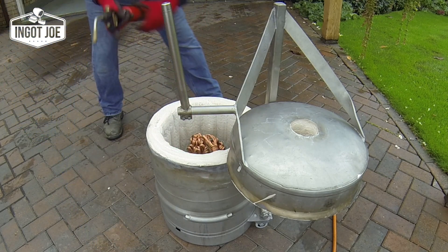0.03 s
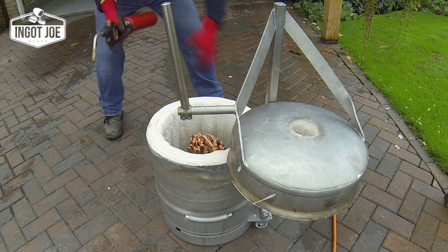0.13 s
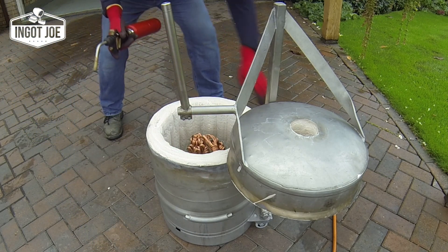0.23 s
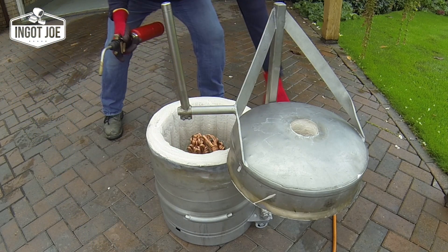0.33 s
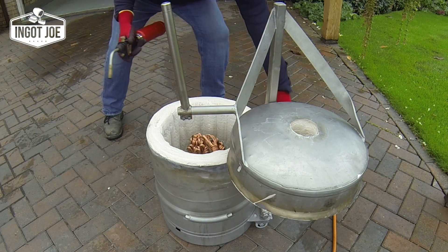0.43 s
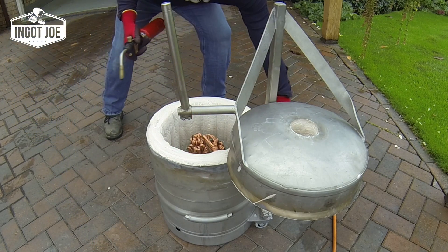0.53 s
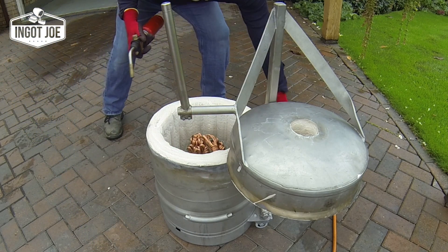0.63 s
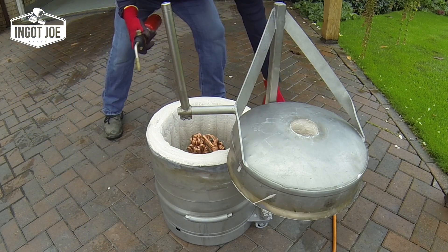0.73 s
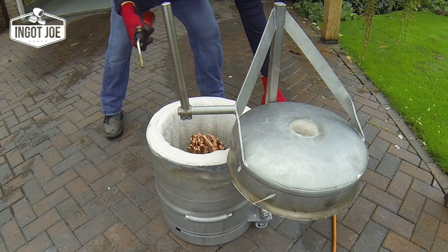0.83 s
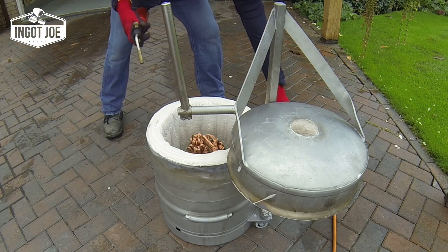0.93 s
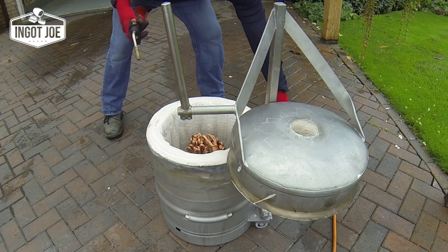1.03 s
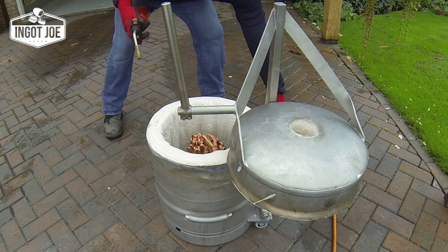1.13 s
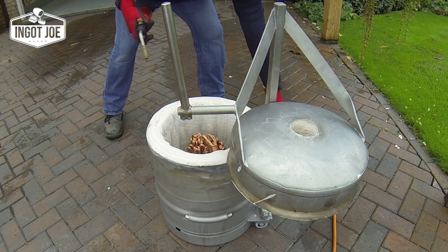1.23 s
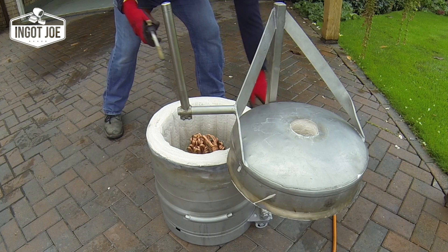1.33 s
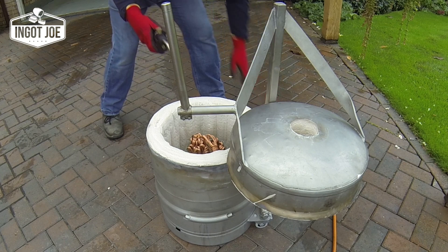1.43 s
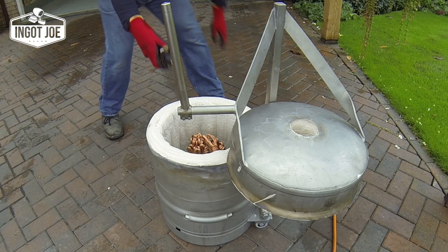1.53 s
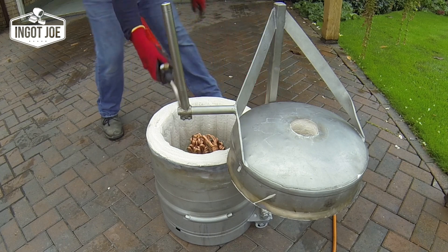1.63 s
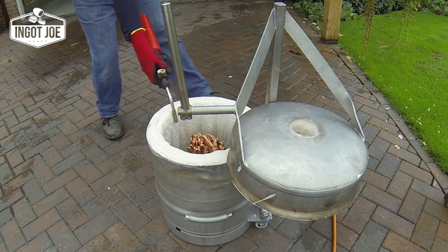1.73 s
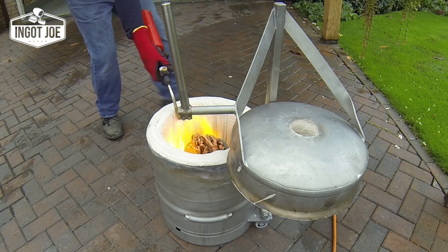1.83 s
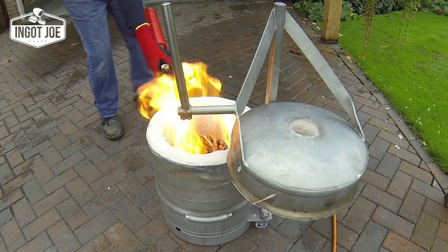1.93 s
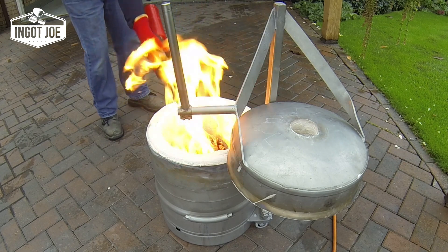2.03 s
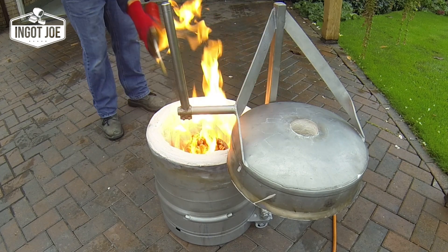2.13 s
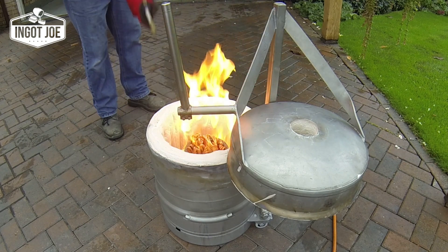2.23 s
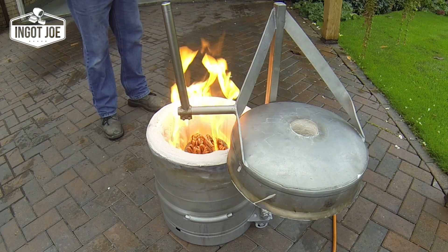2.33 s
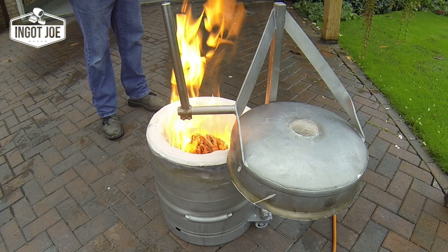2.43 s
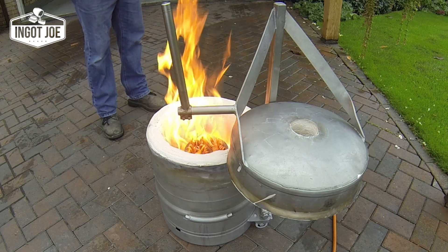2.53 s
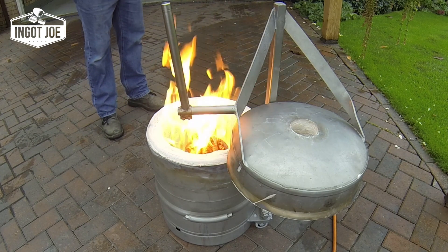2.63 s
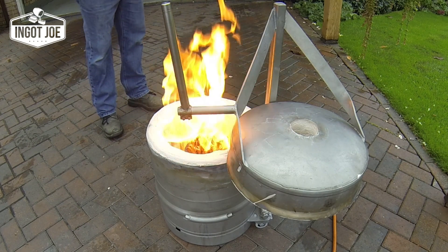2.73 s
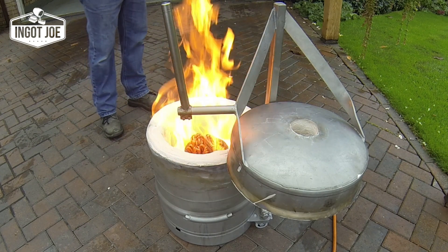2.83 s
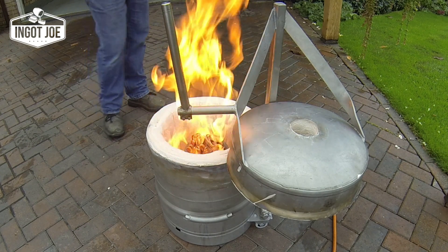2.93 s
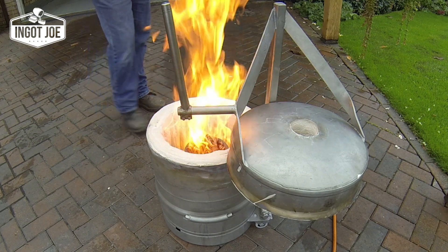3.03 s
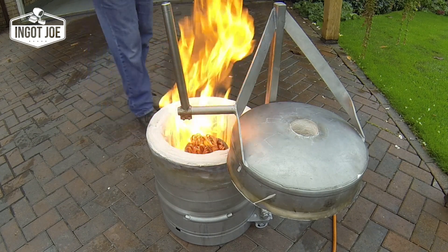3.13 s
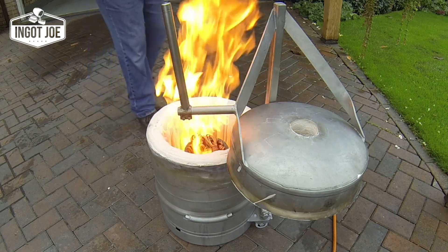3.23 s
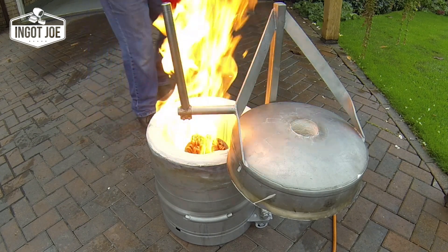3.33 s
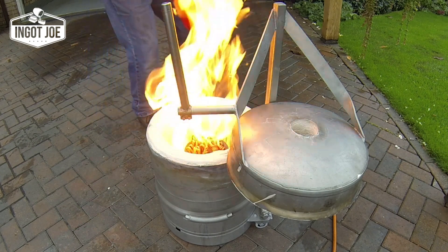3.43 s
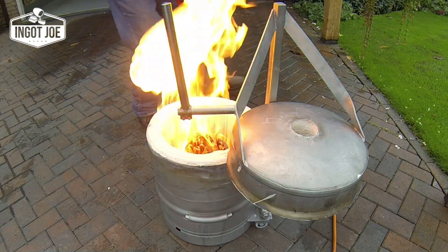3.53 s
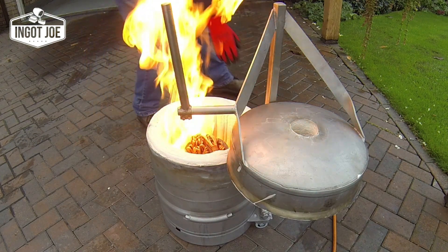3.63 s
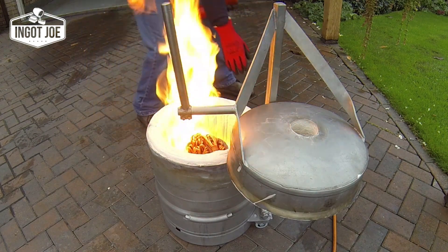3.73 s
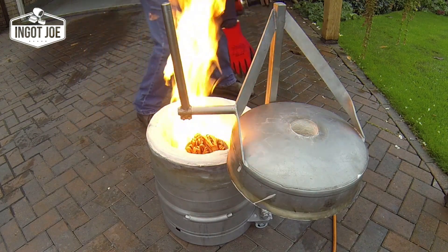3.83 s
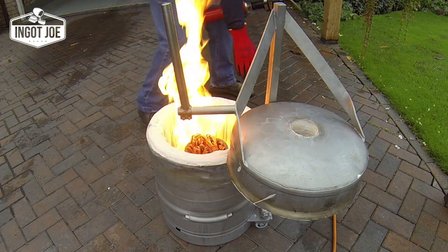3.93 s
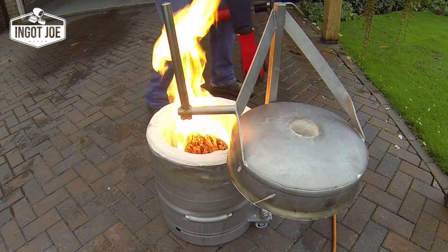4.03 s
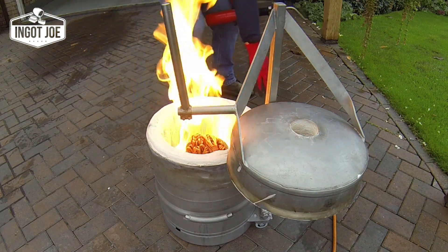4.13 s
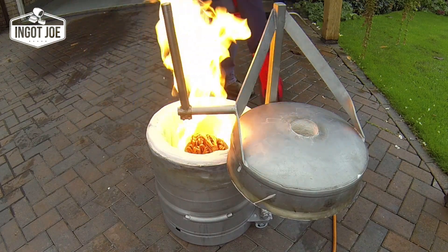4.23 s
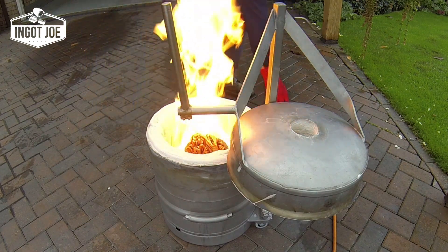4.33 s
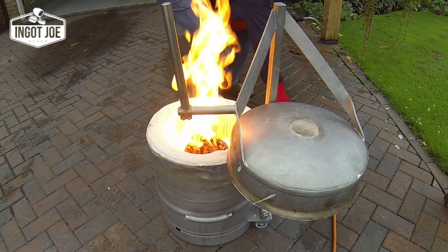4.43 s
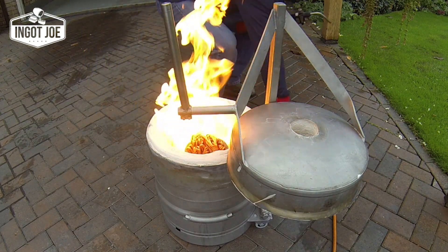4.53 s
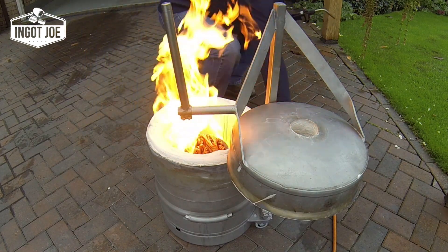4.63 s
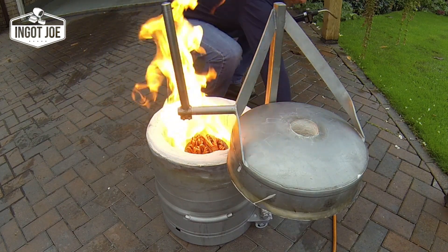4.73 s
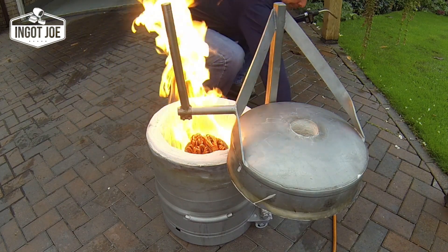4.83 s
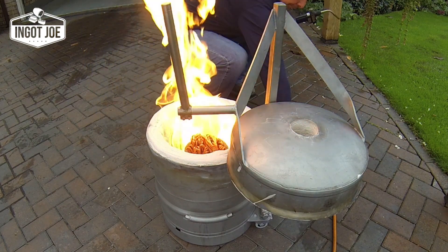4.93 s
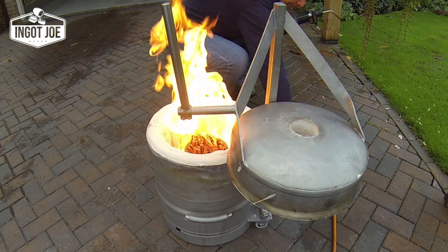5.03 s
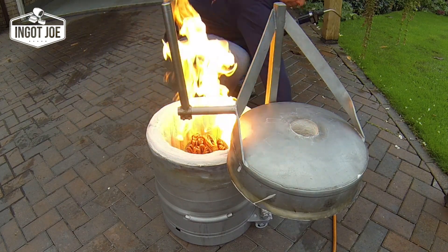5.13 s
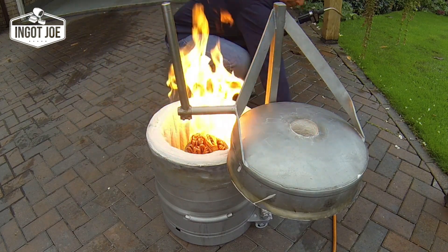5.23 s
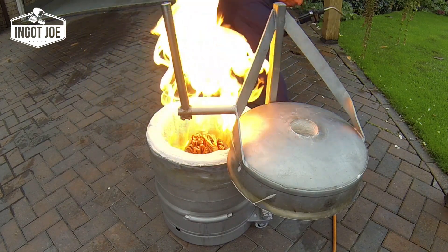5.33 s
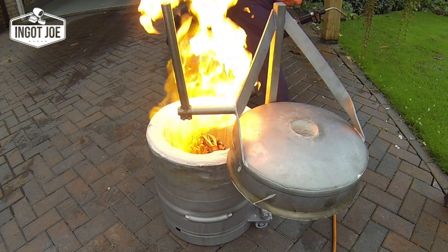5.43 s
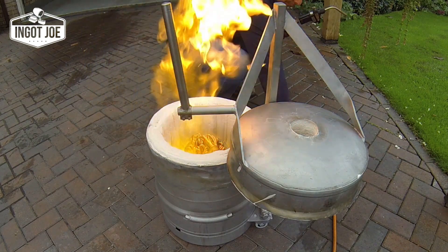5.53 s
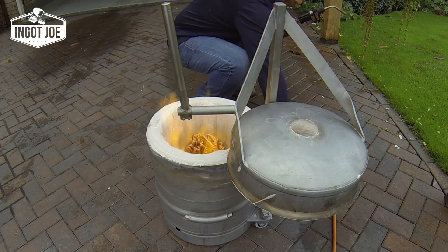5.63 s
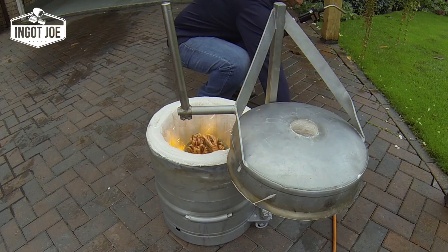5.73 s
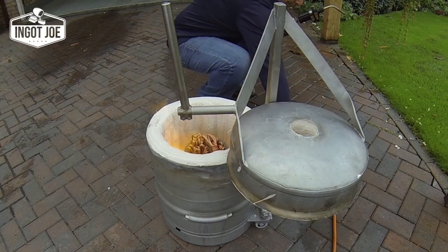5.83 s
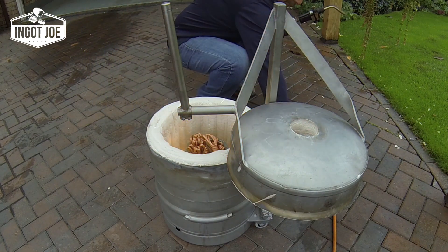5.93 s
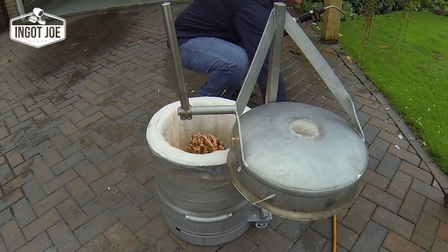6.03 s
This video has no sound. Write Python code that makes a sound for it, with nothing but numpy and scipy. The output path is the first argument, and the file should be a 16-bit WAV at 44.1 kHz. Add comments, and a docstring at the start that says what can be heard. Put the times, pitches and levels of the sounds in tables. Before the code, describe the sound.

A quiet paved yard with faint airy background, heard close in wavering stereo. A dull boot thud opens, then a tiny faint squeak at 0.2 seconds and soft metal clicks until 0.7. At about 1.05 a gas valve opens: a sharp, bright hiss starts abruptly and rings thinly in the burner tube. At 1.72 a torch clicks sharply and the gas catches in a low whoump and rushing surge, fading by about 2.1 with another click near 1.96. From 2.2 to 5.1 a weak, lazy flame flutters under the steady hiss, with wavering, faint hollow tube notes and scattered muffled thuds, strongest around 3.1 to 3.7 and 4.2. At 5.17 the valve clicks and a spurt of flame rushes up; hollow roaring and booms build from 5.3. Ringing metal clicks and further spurts follow at 5.45 and 5.75, then heavy deep booms and a throbbing roar dominate until the cut-off near 6.1.

```python
"""Dull thuds of boots, a faint squeak and metal clicks sound over a paved yard with a lined steel drum burner.
The valve opens: jet noise hisses and excites the burner tube. A torch clicks and the cloud flashes as a low surge.
A lazy flame flutters, made of random puffs exciting resonances; spurts of gas, more air and big booms of burning
pockets then turn it into a throbbing roar.
One microphone feeds two outputs, whose phase and level differences vary over frequency; the phase wavers."""
import sys
import numpy as np
from scipy import signal
from scipy.io import wavfile
from scipy.ndimage import uniform_filter1d

SR = 44100
rng = np.random.default_rng(int(sys.argv[2]) if len(sys.argv) > 2 else 0)


def transcribe(u):
    """Save the signal u as a 16-bit wav file named by the first command-line argument.

    u: samples, shape (n,) or (channels, n), limited to [-1, 1]; the rate is SR.
    q: integer samples, one column per channel.
    """
    v = np.clip(np.atleast_2d(u).T, -1, 1)
    q = np.round(v * 32767).astype(np.int16)
    wavfile.write(sys.argv[1], SR, q)


N = 268833
IGNITION_S = 1.72  # the gas catches


def from_db(db):
    """Amplitude ratio: 20 dB for each factor of ten."""
    return 10 ** (np.asarray(db) / 20)


def rms_one(x):
    """Normalisation of the signal to unit root-mean-square amplitude."""
    return x / np.sqrt(np.mean(x ** 2) + 1e-20)


def in_time(rows):
    """Linear interpolation of each column against time, one value a sample."""
    s, *columns = np.transpose(rows)
    return [np.interp(np.arange(N) / SR, s, column) for column in columns]


def at_hz(table, hz, axis=1):
    """Interpolation of one column over the logarithm of frequency."""
    table = np.array(table)
    return np.interp(np.log(hz + 1), np.log(table[:, 0]), table[:, axis])


def drift(corner_hz):
    """Low-pass noise: two equal poles leave a slow random fluctuation of unit rms."""
    step = 40  # samples between computed points
    pole = np.exp(-2 * np.pi * corner_hz * step / SR)
    white = rng.standard_normal(N // step + 2002)
    slow = signal.lfilter([1], [1, -2 * pole, pole * pole], white)[2000:]  # past the onset of the filter
    return np.interp(np.arange(N) / step, np.arange(len(slow)), rms_one(slow))


def resonances(x, modes):
    """Modal superposition: parallel damped resonators (Hz, width Hz, dB) of alternating sign."""
    out = 0
    for k, (hz, width, db) in enumerate(modes):
        radius = np.exp(-np.pi * abs(width) / SR)
        gain = from_db(db) * (-1) ** k * (1 - radius * radius) / 2
        poles = [1, -2 * radius * np.cos(2 * np.pi * hz / SR), radius * radius]
        out = out + signal.lfilter(gain * np.array([1, 0, -1]), poles, x + 1e-18)
    return out


def steadied(x, over_s, share):
    """Envelope compression: a share of the sound's own short-term swell is divided out."""
    swell = uniform_filter1d(rms_one(x) ** 2, round(over_s * SR)) + .02
    return rms_one(x / swell ** (share / 2))


def hiss(spectrum, patchy_db, shared_db):
    """Turbulence noise: half-octave bands flicker partly alone and partly together."""
    out, together = 0, drift(4.2)
    edges = 200 * 2 ** np.arange(0, 6.6, .5)  # Hz
    white = rng.standard_normal((2, N))
    for k, (low, high) in enumerate(zip(edges, edges[1:])):
        level_db = at_hz(spectrum, np.sqrt(low * high))
        level_db = level_db + patchy_db * drift(10) + shared_db * together
        bandpass = signal.butter(2, [low, high], "band", fs=SR, output="sos")
        out = out + from_db(level_db) * signal.sosfilt(bandpass, white[k % 2])
    return rms_one(out)


def puffs(per_s, uneven_db):
    """Random impulse train: independent clicks of very uneven size and random sign."""
    sizes = from_db(uneven_db * np.minimum(rng.exponential(1, N), 4))
    signs = rng.choice([-1, 1], N)
    return sizes * signs * (rng.random(N) < per_s / SR)


def yard_air():
    """Background noise: a steady-level spectrum whose bands flicker."""
    # sound of the yard: (frequency [Hz], relative density [dB per Hz])
    spectrum = [(300, -20), (700, 3), (1500, -15), (2500, -19), (5000, -15.5), (10000, -11.5), (13000, -24),
                (16000, -38)]
    return from_db(-60.5) * hiss(spectrum, patchy_db=-2.0, shared_db=-2.0)


def flame():
    """Combustion noise: pockets burning one by one excite deep and drum modes, under a rush of noise."""
    # low sound of yard, flash, lazy flame and blast, before flutter and spurts:
    # (time [s], rumble level [dB], drum roar level [dB], flame rush level [dB])
    burn = [(0, -52, -49, -58), (.3, -53.5, -59.5, -63.5), (1.03, -50.5, -62, -63.5),
            (1.06, -47, -50.5, -53.5), (1.55, -54.5, -55.5, -54), (1.722, -54, -50.5, -50),
            (1.735, -21, -40, -28), (1.8, -43, -30.5, -30.5), (1.9, -43, -31.5, -36),
            (2.0, -48, -36, -39.5), (2.15, -51.5, -53, -52.5), (2.8, -51, -46.5, -57),
            (3.2, -47, -46.5, -53.5), (4.0, -49, -51.5, -56.5), (4.35, -48.5, -47.5, -54),
            (5.165, -49.5, -54, -56.5), (5.2, -46, -37.5, -41), (5.31, -31.5, -24, -44.5),
            (5.55, -30, -23.5, -36), (5.71, -18, -18.5, -35.5), (5.765, -29, -22, -34.5),
            (5.81, -24, -16, -36.5), (5.9, -16.5, -17.5, -40), (6.09, -28.5, -15, -37.5)]
    # deep modes: (frequency [Hz], width [Hz], gain [dB])
    rumble_modes = [(59.3, 54, -2.5), (90, 45.4, -5)]
    # modes of the hollow drum: (frequency [Hz], width [Hz], gain [dB])
    drum_modes = [(117, 21.5, 1), (157.2, 30.6, 1.5), (239.2, 19.2, -3), (301.3, 15.8, -3),
                  (357.2, 29.6, -3.5), (473.3, 9.6, -7.5), (542.4, 32, -11), (745, 720, -30.5)]
    # flame rush: (frequency [Hz], relative density [dB per Hz])
    rush_spectrum = [(300, -10), (600, 0), (1000, -3.5), (1400, -3.5), (2200, -7.5), (3500, -18.5),
                     (7000, -15), (15000, -16.5)]
    rumble_db, roar_db, rush_db = in_time(burn)

    burning = puffs(per_s=1100, uneven_db=3.5)
    deep = resonances(burning + 1.5 * rms_one(rng.standard_normal(N)), rumble_modes)
    rumble = steadied(resonances(deep, [(76.6, 103, 0)]), over_s=0.14, share=1.0)
    hollow = resonances(burning, drum_modes)
    roar = steadied(resonances(hollow, [(246, 344, 0)]), over_s=0.0048, share=0.32)
    rush = hiss(rush_spectrum, patchy_db=-0.5, shared_db=0.74)

    lit = np.arange(N) / SR > IGNITION_S
    flutter_hz = 9.0
    # flutter of the burning flame, rms dB
    rumble_db = rumble_db + lit * 2.5 * drift(flutter_hz)
    roar_db = roar_db + lit * 1.5 * drift(flutter_hz)
    rush_db = rush_db + lit * 1.5 * drift(flutter_hz) + spurts()
    return from_db(rumble_db) * rumble + from_db(roar_db) * roar + from_db(rush_db) * rush


def thuds():
    """Impact excitation: a packed run of blows and a weaker dying tail drive broad low modes."""
    # dull thuds of boots and flame flaps: (time [s], peak level [dB], pitch [Hz])
    blows_in_time = [(0.036, -30.5, 446), (0.476, -47, 222), (1.056, -39.5, 282), (2.206, -34.5, 302),
                     (2.713, -33, 332), (2.862, -35.5, 325), (3.095, -28.5, 353), (3.439, -40, 202),
                     (3.574, -29, 320), (3.654, -26, 460), (3.922, -45, 339), (4.229, -28, 300),
                     (4.762, -46.5, 320), (4.919, -41.5, 360)]
    hold_s, tail_db, t60_s = .016, -9, .25
    out, t = np.zeros(N), np.arange(round(.3 * SR)) / SR
    envelope = np.where(t < hold_s, 1, from_db(tail_db - 60 * t / t60_s))
    for s, db, hz in blows_in_time:
        blows = (rng.random(len(t)) < 500 / SR) * rng.normal(0, 1, len(t))  # 500 blows a second
        blows[0] = 2
        # three low modes, and a short crack at 1200 Hz
        modes = [(hz, 70, 0), (hz / 1.6, 60, -2), (1.39 * hz, 110, -4), (1200, 800, -24)]
        body = resonances(blows * envelope, modes)
        body = resonances(body, [(hz, 800, 0)])
        at = round(s * SR)
        out[at:at + len(t)] += from_db(db) * body / np.abs(body).max()
    return out


def squeak():
    """Frequency modulation: a short faint sine whose pitch wanders slightly."""
    # (start [s], end [s], mean frequency [Hz], peak level [dB])
    start, end, hz, db = (.16, .22, 1700, -53.5)
    t = np.arange(N) / SR
    shape = np.clip(np.minimum(t - start, end - t) / 0.0055, 0, 1)  # 5.5 ms ramps
    pitch = hz * (1 + 0.0068 * drift(25))
    return from_db(db) * shape * np.sin(2 * np.pi * np.cumsum(pitch) / SR)


def rubs():
    """Frictional contact: dense tiny impacts start sharply, hold and decay, partly exciting fitting modes."""
    # metal clicks and rubs of torch and valve:
    # (time [s], drive level [dB], hold end after onset [s], ringing re drive [dB], centre [Hz])
    contacts_in_time = [(0.255, -60, .005, -1, 8000), (0.563, -46, 0.016, -7, 4860),
                        (0.697, -55, 0.024, 5, 8950), (1.7215, -20, .01, 0, 4200),
                        (1.964, -29, 0.0078, 0, 6000), (5.182, -27.5, 0.019, -5, 8000),
                        (5.44, -34, 0.01, 6, 10000), (5.484, -31.5, 0.024, 17, 6070),
                        (5.728, -27.5, 0.0085, 10, 10100), (5.764, -32.5, 0.034, 20.5, 3000)]
    # modes of the brass fittings: (frequency [Hz], width [Hz], gain [dB])
    fitting_modes = [(4490, 38, -15), (6130, 31, 0), (6930, 49, -6), (7920, 100, -8), (8850, 120, -16),
                     (12100, 48, -10), (12800, 90, -8), (13500, 46, -8)]
    attack_s, t60_s = .0008, .12
    t, plain, ringing = np.arange(round(.25 * SR)) / SR, np.zeros(N), np.zeros(N)
    contacts = rms_one(puffs(per_s=12000, uneven_db=2.0))
    for s, db, hold_s, ring_db, hz in contacts_in_time:
        at = round(s * SR)
        decay = from_db(db - 60 * np.maximum(t - hold_s, 0) / t60_s)
        scrape = contacts[at:at + len(t)] * np.minimum(t / attack_s, 1) * decay
        plain[at:at + len(t)] += resonances(scrape, [(hz, 0.82 * hz, 0)])
        ringing[at:at + len(t)] += from_db(ring_db) * scrape
    return plain + resonances(ringing, fitting_modes)


def gas_jet():
    """Jet turbulence: smooth bright noise, with tube resonance that is stronger while the gas is unlit."""
    # (time [s], sharp hiss level [dB], lower hiss level before tube ringing is added [dB])
    jet = [(1.022, -87, -90), (1.05, -37, -43), (1.11, -33, -40.5), (1.284, -36.5, -42.5),
           (1.72, -36.5, -41), (1.745, -34, -36), (1.96, -43.5, -41), (2.1, -40, -45), (2.68, -38.5, -43),
           (2.83, -40, -44.5), (4.08, -39.5, -44), (4.21, -37, -41), (4.4, -39.5, -44), (5.15, -39.5, -43),
           (5.25, -43, -46), (5.67, -38, -43), (6.09, -41, -47)]
    # modes of the burner tube: (frequency [Hz], width [Hz], gain [dB])
    tube_modes = [(1260, 110, -4), (1810, 60, -42), (3090, 9.1, -3), (3663, 23, 11.5), (3946, 38, 12),
                  (4460, 39, 16), (4410, 37, 10), (4945, 57, 10), (5830, 34, -18), (5540, 120, -29),
                  (6230, 48, 6), (7130, 97, -24)]
    # lower hiss: (frequency [Hz], relative density [dB per Hz])
    lower_spectrum = [(1000, -14), (2000, -10.5), (3000, -0.5), (4500, -6), (6000, 4), (8000, 2),
                      (11000, -42)]
    # sharp hiss: (frequency [Hz], relative density [dB per Hz])
    sharp_spectrum = [(5000, -18), (7500, -9.5), (9500, -2.5), (11500, -1.5), (13000, 1), (15500, -9.5)]
    sharp_db, lower_db = in_time(jet)
    ringing_db = np.where(np.arange(N) / SR < IGNITION_S, -5, -11)  # relative to the lower hiss
    ringing = from_db(ringing_db) * rms_one(resonances(rng.standard_normal(N), tube_modes))
    lower = hiss(lower_spectrum, patchy_db=.6, shared_db=.5) + ringing
    sharp = hiss(sharp_spectrum, patchy_db=-1.6, shared_db=-0.85)
    return from_db(lower_db) * lower + from_db(sharp_db) * sharp


def tube_notes():
    """Selective resonance: noise passes each narrow tube mode twice, giving two wavering notes."""
    # before waver and spurts: (time [s], lower note level [dB], upper note level [dB])
    notes = [(1.04, -72, -78), (1.15, -63, -62), (1.68, -61, -63), (1.77, -34.5, -63), (1.96, -46.5, -58),
             (2.1, -51.5, -63), (3.0, -56, -64), (3.75, -67, -59.5), (4.27, -55, -56), (4.82, -62.5, -57),
             (5.1, -59, -56), (5.4, -50, -65), (6.09, -49, -69)]
    # (frequency [Hz], width [Hz], gain [dB])
    note_modes = [(1347.4, 43.5, 0), (1845, 62, 0)]
    out, white = 0, rng.standard_normal(N)
    for mode, level_db in zip(note_modes, in_time(notes)):
        level_db = level_db + 1.2 * drift(5.0) + spurts()  # waver of 1.2 dB rms
        note = resonances(resonances(white, [mode]), [mode])
        out = out + from_db(level_db) * steadied(note, over_s=0.023, share=0.46)
    return out * (np.arange(N) / SR > notes[0][0])  # from the moment the gas flows


def booms():
    """Impulse response: each big pocket of gas gives the drum one push and a short ring."""
    # pockets going off in the drum: (time [s], peak level [dB], pitch [Hz])
    pockets = [(1.727, -22, 145), (1.796, -17, 91.5), (2.224, -35, 91.5), (5.293, -15, 151),
               (5.397, -13, 339), (5.609, -16, 323), (5.784, -10, 135), (5.838, -4, 156), (5.941, -4, 110),
               (5.964, -7, 145), (6.049, -8, 153)]
    out, push = np.zeros(N), np.zeros(round(.12 * SR))
    push[0] = 1
    for s, db, hz in pockets:
        body = resonances(push, [(hz, 50, 0), (350, 70, -15)])
        body = resonances(body, [(hz, 220, 0)])  # softens the push
        at = round(s * SR)
        out[at:at + len(push)] += (from_db(db) * body / np.abs(body).max())[:N - at]
    return out


def spurts():
    """Level modulation: as the valve is turned up, each spurt swells fast, holds and sinks back, in dB."""
    # (full rise reached [s], hold [s], rise of the flame rush and tube notes [dB])
    valve_turns = [(5.16, 0.031, 12), (5.47, 0.038, 5.5), (5.774, 0.028, 6)]
    rise_s, fall_s = .012, 0.066
    t, rise_db = np.arange(N) / SR, 0
    for s, hold_s, db in valve_turns:
        corners = [s - rise_s, s, s + hold_s, s + hold_s + fall_s]
        rise_db = rise_db + np.interp(t, corners, [0, db, db, 0])
    return rise_db


def scene():
    """Linear superposition of all sources at one microphone."""
    fire = flame() + booms() + gas_jet() + tube_notes()
    mono = fire + thuds() + rubs() + squeak() + yard_air()
    return np.tile(mono, (2, 1))


def record(dry):
    """Interchannel difference: phase and level are split evenly between outputs; bass and top are cut."""
    # (frequency [Hz], right leads by [rad], left minus right [dB], rms waver of the lead [rad])
    outputs = [(100, -.06, 0, .08), (380, -.25, -.5, .2), (600, -1.4, 5, .8), (860, -3, 6, 1.2),
               (1150, -.6, -7, 1.3), (1400, .3, -1, .6), (1900, 1.6, 1.5, 1.2), (2400, 3.1, 0, 1.2),
               (3100, 5.6, -1.5, .8), (3500, 2 * np.pi, 0, 0), (4150, 2 * np.pi, 0, 0), (4500, 6.55, 0, .6),
               (8000, 8.35, 0, .8), (8800, 3 * np.pi, 0, 0), (10600, 3 * np.pi, 0, 0),
               (11400, 10.45, 0, .7), (12800, 11.5, 0, .8), (13350, 4 * np.pi, 0, 0)]
    hz, _, frames = signal.stft(dry, SR, nperseg=1024, noverlap=768)
    lead, balance_db, waver = [at_hz(outputs, hz, axis=k)[:, None] for k in range(1, 4)]
    # chance is smoothed over frequency and then time, so the phase wavers in patches
    chance = uniform_filter1d(rng.standard_normal(frames.shape[1:]), size=10, axis=0)
    chance = uniform_filter1d(chance, size=6, axis=1)
    side = np.array([-.5, .5])[:, None, None]  # left, right
    phase = side * (lead + waver * rms_one(chance))
    frames = frames * np.exp(1j * phase) * from_db(-balance_db * side)
    out = signal.istft(frames, SR, nperseg=1024, noverlap=768)[1][:, :N]
    out = signal.sosfilt(signal.butter(4, 52, "high", fs=SR, output="sos"), out)
    return signal.sosfilt(signal.ellip(12, .3, 70, 15750, fs=SR, output="sos"), out)


dry = scene()
out = record(dry)
transcribe(out)
```